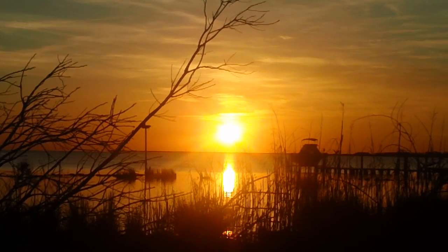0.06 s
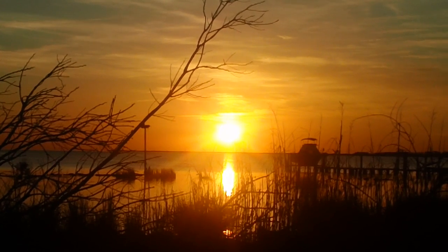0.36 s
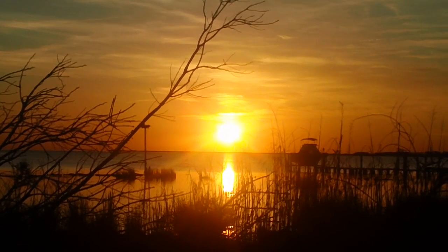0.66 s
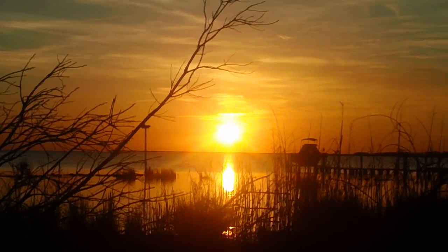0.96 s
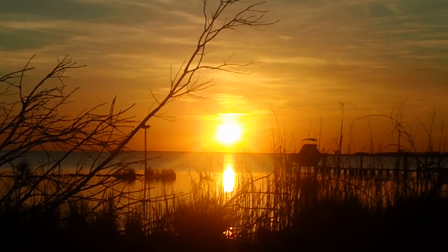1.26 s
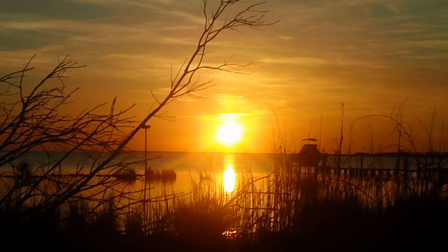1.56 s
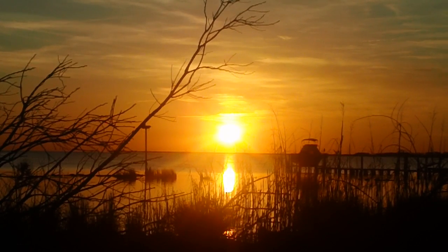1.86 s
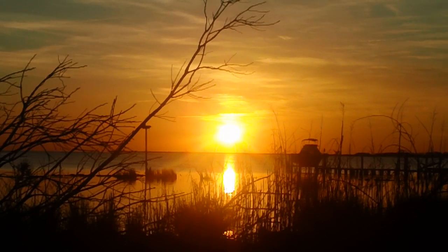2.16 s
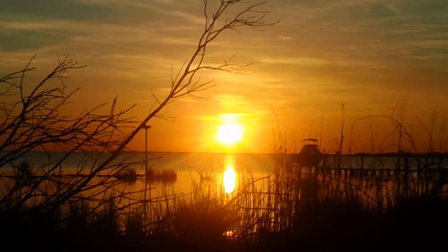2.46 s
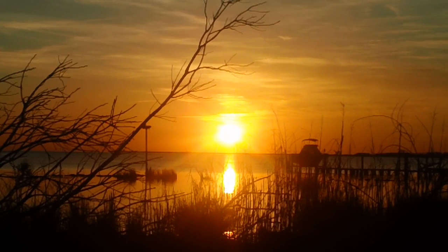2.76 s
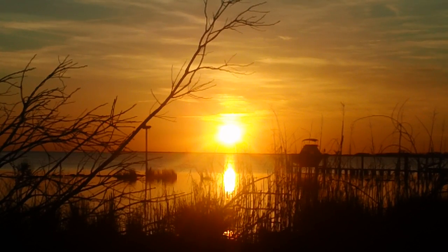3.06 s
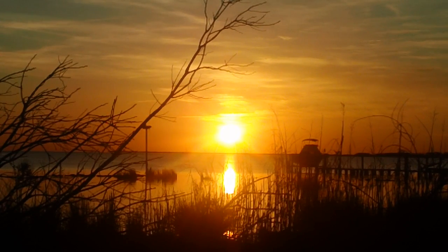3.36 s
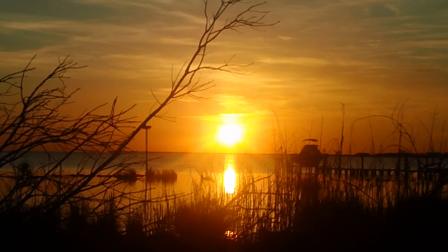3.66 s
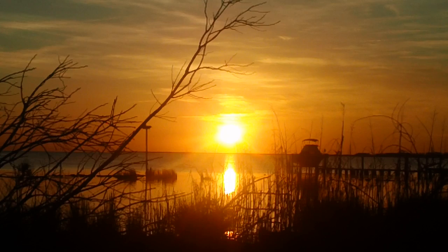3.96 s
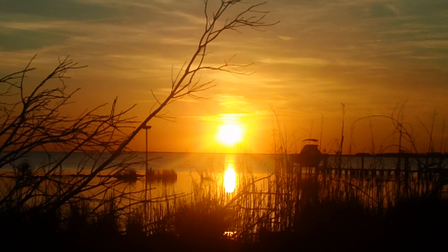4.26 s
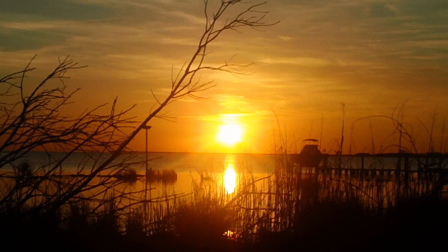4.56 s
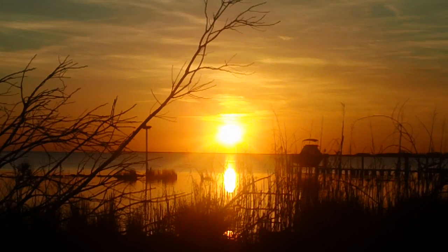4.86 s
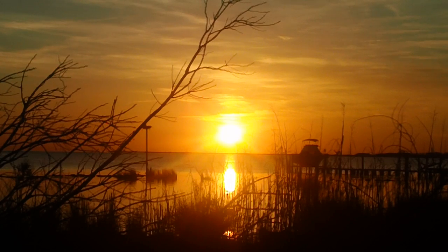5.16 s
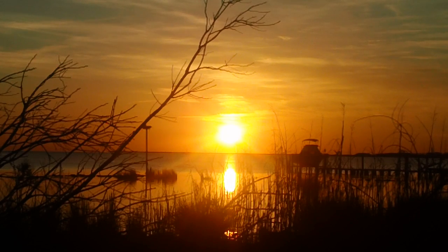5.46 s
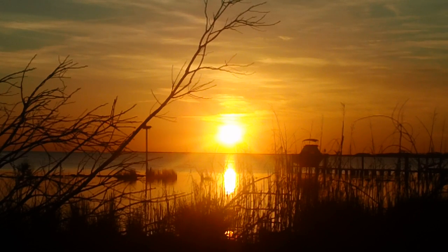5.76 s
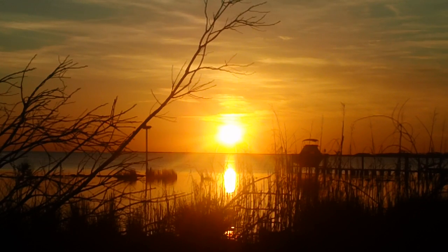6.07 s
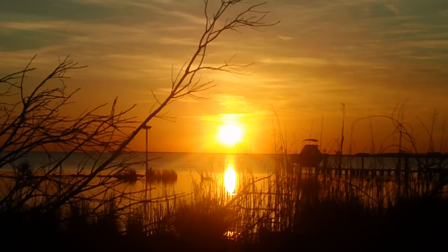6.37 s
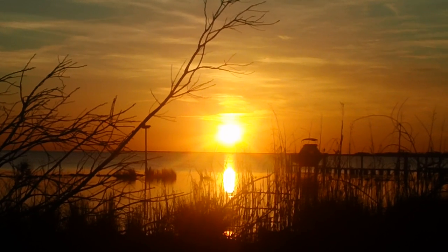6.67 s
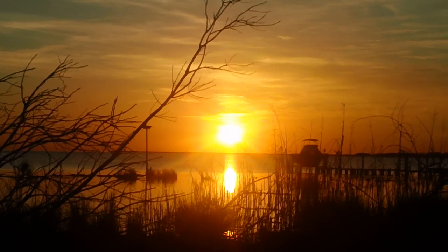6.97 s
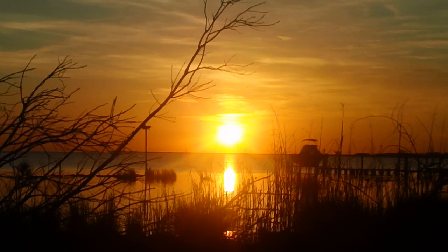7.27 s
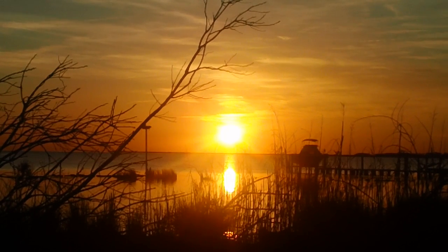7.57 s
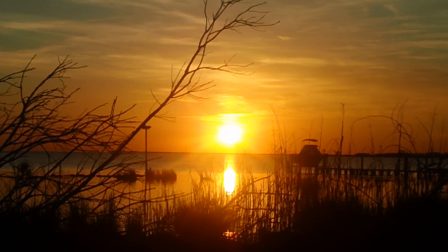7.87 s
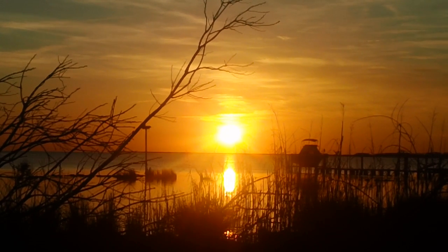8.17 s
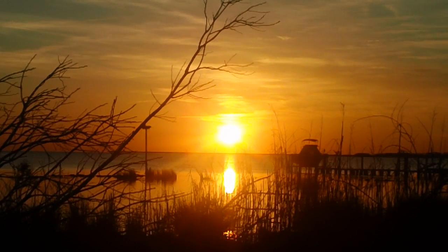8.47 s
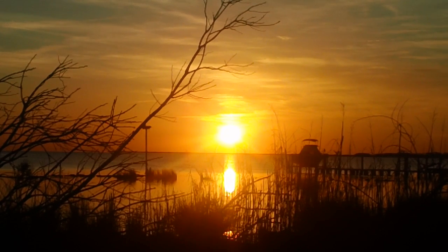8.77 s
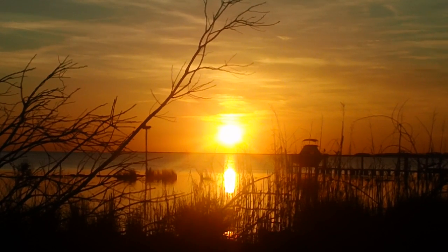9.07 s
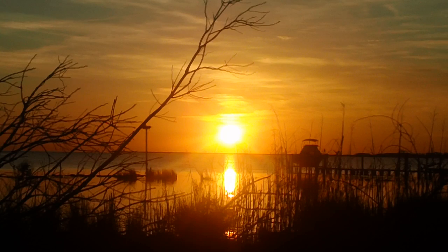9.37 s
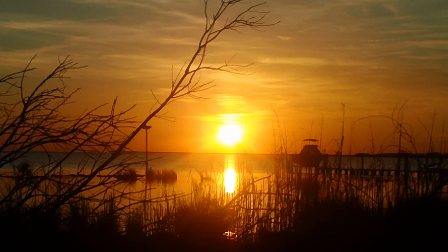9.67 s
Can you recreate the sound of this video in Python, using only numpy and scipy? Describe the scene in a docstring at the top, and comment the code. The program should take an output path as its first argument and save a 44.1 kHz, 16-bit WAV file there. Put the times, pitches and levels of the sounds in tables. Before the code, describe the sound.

A motor vehicle passes with a deep throbbing exhaust and recedes, while reeds rustle faintly and a small bird chirps twice.

```python
"""Throbbing exhaust along a lake shore

A motor vehicle passes, eases off, picks up briefly and recedes. Its deep throb is a stack of crank
harmonics with a burble of uneven firings in the pipe; trees on the shore scatter the note back.
Tyre roar and engine hiss come through in the clear for a second at the nearest point.
Close by, over a faint hiss and a low rumble, reeds rustle and a small bird chirps twice."""
import sys
import numpy as np
from scipy import signal
from scipy.fft import rfft, irfft, next_fast_len
from scipy.io import wavfile

SR = 44100
rng = np.random.default_rng(int(sys.argv[2]) if len(sys.argv) > 2 else 0)


def wav_out(sig):
    """Save sig, one row per channel (or a flat mono array), as 16-bit PCM at SR to the path in sys.argv[1]."""
    wavfile.write(sys.argv[1], SR, np.round(np.clip(np.atleast_2d(sig).T, -1, 1) * 32767).astype(np.int16))


N = 437455
TIME = np.arange(N) / SR

# envelopes of the rushing noise: (time [s], tyre roar [relative dB], hiss [relative dB])
RUSH_LEVELS = [(0,-42.5,-52),(0.5,-44.5,-51),(1.4,-38,-49),(2.4,-35.5,-47),(3.1,-32.5,-49.5),(3.47,-31.5,-41),(3.85,-28.5,-41.5),(4.3,-30.5,-47),(4.6,-37,-54),(5.15,-37.5,-56),(5.45,-38,-49.5),(6.85,-36,-53),(7.4,-35.5,-49.5),(8.6,-38.5,-54),(9.92,-40.5,-54)]
# harmonics that carry the exhaust note: (crank order [cycles per turn])
STRONG_ORDERS = [2, 3, 4, 5, 6, 8]


def from_db(db):
    """Decibels to gain."""
    return 10 ** (np.asarray(db) / 20)


def unit_rms(x):
    """Scale to unit rms."""
    return x / np.sqrt(np.mean(x ** 2) + 1e-20)


def in_time(rows):
    """Each column of a breakpoint table at every sample."""
    times, *columns = np.transpose(rows)
    return [np.interp(TIME, times, column) for column in columns]


def at_hz(spectrum, hz):
    """Gain of a spectrum at the given frequencies."""
    points_hz, db = np.transpose(spectrum)
    return from_db(np.interp(np.log(hz), np.log(points_hz), db))


def bump(at_s, half_s):
    """A smooth swell of height 1."""
    return np.exp(-((TIME - at_s) / half_s) ** 2)


def drift(rate_hz):
    """Smooth random wander of spread 1."""
    hop, settle = 40, 2000
    pole = np.exp(-2 * np.pi * hop * rate_hz / SR)
    white = rng.standard_normal(N // hop + settle + 2)
    slow = signal.lfilter([1], [1, -2 * pole, pole * pole], white)[settle:]
    return np.interp(np.arange(N) / hop, np.arange(len(slow)), unit_rms(slow))


def noise(spectrum):
    """Noise of unit rms with the given colour."""
    size = next_fast_len(N)
    hz = np.maximum(np.arange(size // 2 + 1) * SR / size, 1)
    coloured = rfft(rng.standard_normal(size)) * at_hz(spectrum, hz)
    return unit_rms(irfft(coloured, size)[:N])


def resonate(x, hz, width_hz):
    """A steep-sided resonance (two equal stages) with gain 1 at its peak."""
    r = np.exp(-np.pi * width_hz / SR)
    b = np.array([1, 0, -1]) * (1 - r * r) / 2
    a = [1, -2 * r * np.cos(2 * np.pi * hz / SR), r * r]
    return signal.lfilter(b, a, signal.lfilter(b, a, x))


def outdoor_bed(hiss_end_db=-53.5, rise_db_per_s=0.57, dip_db=6.5, rumble_db=-54.5):
    """A low rumble and a faint hiss that grows slowly and dips around the nearest point."""
    # colours of the hiss and the rumble: (frequency [Hz], relative level [dB])
    hiss_colour = [(200,6),(2000,4),(5000,1.5),(10000,-3),(15000,-6)]
    rumble_colour = [(20, -11), (45, -11), (70, 4.5), (150, -10.5), (500, -43)]
    hiss_db = hiss_end_db + rise_db_per_s * (TIME - TIME[-1]) - dip_db * bump(at_s=4.1, half_s=1.1)
    return from_db(hiss_db) * noise(hiss_colour) + from_db(rumble_db) * noise(rumble_colour)


def reeds():
    """Dry stems brush together in short, soft swishes."""
    # swishes: (time [s], half length [s], level [dB])
    swishes = [(1.02,.07,-60),(1.19,.07,-59),(1.46,.05,-58),(2.11,.06,-59),(2.39,.025,-59)]
    # colour of dry stems: (frequency [Hz], relative level [dB])
    stem_colour = [(1500, -20), (4500, 0), (10000, -2), (15000, -9)]
    swell = sum(from_db(db) * bump(at_s, half_s) for at_s, half_s, db in swishes)
    grain = unit_rms(from_db(2 * drift(150)))
    return swell * grain * noise(stem_colour)


def bird():
    """Each chirp is a thin whistle that arches and slides down."""
    # calls: (start [s], length [s], top pitch [Hz], base level [dB])
    chirps = [(2.430,.052,7650,-50.5),(2.531,.056,7650,-52.5)]
    # contour of a call: (position [share of length], pitch [share of top], level change [dB])
    contour = [(0,.95,-16),(.15,.983,-3),(.4,1,-5),(.62,.915,3),(.84,.863,4),(1,.89,-8)]
    position, pitch, contour_db = np.transpose(contour)
    out = np.zeros(N)
    for start_s, length_s, top_hz, db in chirps:
        progress = np.linspace(0, 1, int(length_s * SR))
        hz = top_hz * np.interp(progress, position, pitch)
        whistle = np.sin(2 * np.pi * np.cumsum(hz) / SR)
        gain = from_db(db + np.interp(progress, position, contour_db))
        at = int(start_s * SR)
        out[at:at + len(hz)] += whistle * gain * signal.windows.tukey(len(hz), .2)
    return out


def whine(flutter_db=2.1, doppler_share=.03, passing_s=4.8, glide_s=.9):
    """The tread sings with the roar, engine parts with the hiss, dropping in pitch as they go by."""
    # resonances of the tread, then of three engine parts: (frequency [Hz], width [Hz])
    resonances = [(755,130),(2200,120),(3500,250),(4380,190)]
    # one swell for each: (offset from the rush envelope [dB], peak [s], half length [s], swell [dB])
    swells = [(-14,4.14,2.5,6.5),(-13.5,0.95,0.84,8),(-17,4.0,2.5,6.5),(-23.5,5.2,.5,13)]
    emitted_sample = np.cumsum(1 - doppler_share * np.tanh((TIME - passing_s) / glide_s))
    roar_db, hiss_db = in_time(RUSH_LEVELS)
    envelopes_db = [roar_db, hiss_db, hiss_db, hiss_db]
    out = np.zeros(N)
    for (hz, width_hz), swell, rush_db in zip(resonances, swells, envelopes_db):
        offset_db, peak_s, half_s, swell_db = swell
        ring = unit_rms(resonate(rng.standard_normal(N + SR), hz, width_hz))
        gain = from_db(rush_db + offset_db + swell_db * bump(peak_s, half_s) + flutter_db * drift(8))
        out += gain * np.interp(emitted_sample, np.arange(len(ring)), ring)
    return out


def in_the_clear(from_s=3.47, to_s=4.22, rise_db_per_s=97, fall_db_per_s=31.5):
    """Gain that rises to 1 as the vehicle comes into the open, holds, and falls as it is screened."""
    before_s, after_s = np.maximum(from_s - TIME, 0), np.maximum(TIME - to_s, 0)
    return from_db(-rise_db_per_s * before_s - fall_db_per_s * after_s)


def rush(turns, throb_depth=0.071, clear_db=-31.5, screened_db=-53.5):
    """Tyre roar carries far; hiss pulses with the firings; a broad rush opens at the nearest point."""
    # colours of the roar, the hiss and the broad rush: (frequency [Hz], relative level [dB])
    roar_colour = [(60,-30),(120,0.5),(250,5.5),(400,-2.5),(520,-5.5),(640,-2),(750,-1.5),(900,-3.5),(1100,-7),(1400,-16),(2000,-22.5),(4000,-46.5)]
    hiss_colour = [(300,-16.5),(700,-0.5),(1300,6),(1800,1.5),(2400,-0.5),(3000,-2),(4000,-6.5),(5000,-8.5),(6000,-12),(7200,-12.5),(8500,-16),(10000,-18),(11500,-38.5),(15000,-43.5)]
    broad_colour = [(80,-39),(220,-6),(330,0.5),(450,1),(700,0),(1500,-15),(3000,-27.5),(5000,-29),(7200,-30.5),(8600,-34.5),(10200,-31),(11200,-39.5),(14000,-44.5)]
    roar_db, hiss_db = in_time(RUSH_LEVELS)
    # each level is envelope + trim + fast flutter
    roar = from_db(roar_db + 0.5 + 0.5 * drift(42)) * noise(roar_colour)
    hiss = from_db(hiss_db + 2.5 + 0.8 * drift(18)) * noise(hiss_colour)
    openness = from_db(clear_db) * in_the_clear() + from_db(screened_db)
    pulsing = 1 + throb_depth * np.cos(8 * np.pi * turns)  # four firings a turn
    return roar + pulsing * (hiss + openness * noise(broad_colour))


def shore_echo(note, t60_s=1.1, level_db=-15, predelay_s=.04):
    """Trees along the shore scatter the exhaust back; the late sound beats against the gliding tones."""
    delay_s = np.arange(int(t60_s * SR)) / SR
    scatter = rng.standard_normal(len(delay_s)) * from_db(-60 * delay_s / t60_s) * (delay_s > predelay_s)
    scatter /= np.sqrt(np.sum(scatter ** 2))
    return from_db(level_db) * signal.fftconvolve(note, scatter)[:N]


def burble(turns, imbalance=0.5):
    """Four firings a turn ring the pipe, each made uneven by its cylinder's bias and by chance."""
    # exhaust pipe resonances: (frequency [Hz], width [Hz], relative level [dB])
    pipe_modes = [(133,54,0),(215.7,43.6,6),(282,25,-9.5)]
    cylinder_bias = np.array([1, -1, 1, 1, -1, 1, -1, -1])
    firing = np.floor(4 * turns).astype(int)
    onsets = np.flatnonzero(np.diff(firing)) + 1
    cylinder = firing[onsets] % len(cylinder_bias)
    pulses = np.zeros(N)
    pulses[onsets] = imbalance * cylinder_bias[cylinder] + rng.standard_normal(len(onsets))
    return unit_rms(sum(from_db(db) * resonate(pulses + 1e-18, hz, width) for hz, width, db in pipe_modes))


def reflection_comb(hz, share=.64, longest_lag_s=.00676, abreast_s=7.28, spread_s=4.98):
    """Gain of a tone mixed with a reflection whose lag shifts as the vehicle moves."""
    lag_s = longest_lag_s / np.hypot(1, (TIME - abreast_s) / spread_s)
    return np.sqrt(1 + share ** 2 + 2 * share * np.cos(2 * np.pi * hz * lag_s))


def strong_order_gains(speed, pivot_hz=150):
    """Each strong order glides through the colour of the silencer and the comb of the reflection."""
    # envelope of the note: (time [s], relative level [dB], tilt about the pivot [dB per octave])
    envelope = [(0.0, -18, -3.5), (0.6, -18, 0.5), (1.4, -20, 0), (2.0, -22, -1), (2.8, -23, -4.5),
                (3.5, -22.5, 2), (4.4, -18, -1.0), (5.0, -19.5, 2.3), (5.7, -18.5, 6.5), (6.8, -24.5, 0.5),
                (7.2, -30.5, 0.8), (8.4, -34.5, 5.5), (9.9, -35.5, -2)]
    # silencer response: (frequency [Hz], gain [dB])
    silencer = [(55.0, -29.5), (75.0, -10.5), (105.0, -8.5), (135.0, -0.5), (160.0, -2.06), (185.0, -9.5),
                (220.0, -4), (260.0, -16.5), (310.0, -27.5), (380.0, -26.5)]
    # balance of the strong orders: (relative level [dB])
    balance = [0.5, 9, -2, -4, -0.2, 3.5]
    # single tones swell or fade for a moment: (time [s], half length [s], change [dB], crank order)
    fades = [(0.102,.22,-9,4),(0.544,0.54,-14,3),(0.643,0.15,5.5,5),(1.55,0.4,-8,3),(1.85,.47,10.5,8),(2.6,0.17,-11,5),(3.36,0.35,20,8),(3.896,0.27,-9.5,6),
             (4.548,.2,-20,4),(5.15,0.64,12.5,2),(5.367,.15,6.5,8),(5.523,0.35,-3.5,5),(6.63,.36,-16.5,6),(9.9,0.32,7.5,5)]
    level_db, tilt_db = in_time(envelope)
    gains = []
    for order, order_db in zip(STRONG_ORDERS, balance):
        hz = order * speed
        fade_db = sum(db * bump(at_s, half_s) for at_s, half_s, db, which in fades if which == order)
        tone_db = level_db + order_db + tilt_db * np.log2(hz / pivot_hz) + fade_db
        gains.append(reflection_comb(hz) * at_hz(silencer, hz) * from_db(tone_db))
    return gains


def exhaust_note(turns, speed, buzz_db, waver_db=1.5, buzz_waver_db=3.0, buzz_trim_db=0.5):
    """Crank orders in step throb once a turn; shifting paths smear them and scatter the high ones."""
    # weaker harmonics that buzz: (crank order [cycles per turn])
    buzz_orders = [7, 9, 10]
    # colour of the buzz: (frequency [Hz], gain [dB])
    buzz_colour = [(200,6),(250,1.5),(300,-8),(340,-11),(390,-9.5),(440,-8.5),(480,-15.5)]
    # how far echoes smear each throb: (time [s], phase lag [rad per squared order step])
    echo_smear = [(1,.18),(2.6,.62),(5.7,.7),(6.6,.12),(7,.15),(7.8,.6)]
    gains = [gain * from_db(waver_db * drift(12.1)) for gain in strong_order_gains(speed)]
    for order in buzz_orders:
        buzz_gain = from_db(buzz_db + buzz_trim_db + buzz_waver_db * drift(2.65))
        gains.append(buzz_gain * at_hz(buzz_colour, order * speed))
    smear, = in_time(echo_smear)
    out = np.zeros(N)
    for order, gain in zip(STRONG_ORDERS + buzz_orders, gains):
        phase_lag = smear * (order - 4) ** 2 + .007 * order ** 2 * drift(4)
        out += np.sqrt(2) * gain * np.cos(2 * np.pi * order * turns - phase_lag)
    return out


def scene():
    """The crank drives the engine layers; reeds, a bird and the outdoor bed lie under them."""
    # the engine eases off, picks up briefly and runs down: (time [s], crank speed [turns per s])
    revs = [(0, 47.3), (0.65, 48.25), (1.3, 46.4), (1.6, 44.7), (1.85, 44.7), (2.4, 43.4), (2.9, 40.5),
            (3.1, 38), (3.3, 36.6), (4.3, 35.8), (4.75, 36.9), (5.2, 38.9), (5.5, 38.9), (6, 37.2),
            (6.55, 34.2), (6.85, 33.4), (7.45, 30.4), (8.3, 29.9), (9.92, 26.6)]
    # exhaust texture: (time [s], buzz [relative dB], burble [dB])
    texture = [(0,-44.5,-37),(2.7,-41.5,-34),(3.7,-41,-39),(4.35,-31,-30),(5.5,-47,-32),(6.6,-37.5,-31.5),(8.65,-50.5,-40),(9.05,-44,-31),(9.92,-55,-36.5)]
    speed, = in_time(revs)
    buzz_db, burble_db = in_time(texture)
    turns = np.cumsum(speed * (1 + 0.0028 * drift(8.7))) / SR  # the revs waver slightly
    note = exhaust_note(turns, speed, buzz_db)
    exhaust = note + shore_echo(note) + from_db(burble_db) * burble(turns)
    bed = outdoor_bed()
    return (exhaust + rush(turns) + whine() + reeds() + bird() + bed)[None]


def record(dry, fade_s=.006, notch_hz=12500, cutoff_hz=15300):
    """A quick fade-in, a deep notch in the high treble and a steep top cut."""
    fade_in = np.sin(np.pi / 2 * np.minimum(TIME / fade_s, 1)) ** 2
    notch = signal.butter(2, [notch_hz - 1100, notch_hz + 1100], "bandstop", fs=SR, output="sos")
    top_cut = signal.ellip(12, .1, 80, cutoff_hz, fs=SR, output="sos")
    return signal.sosfilt(top_cut, signal.sosfilt(notch, fade_in * dry))


dry = scene()
out = record(dry)
wav_out(out)
```